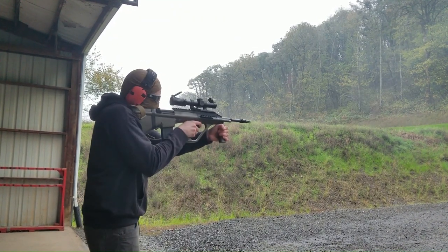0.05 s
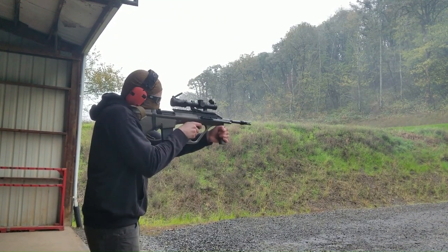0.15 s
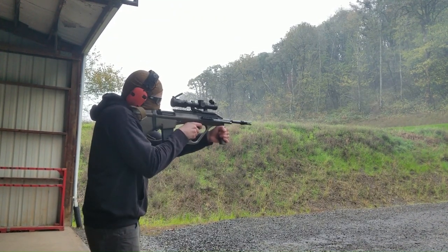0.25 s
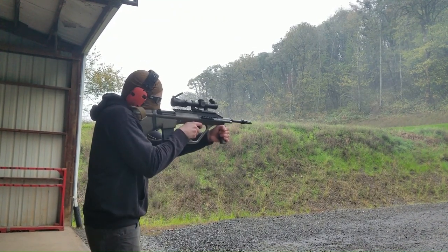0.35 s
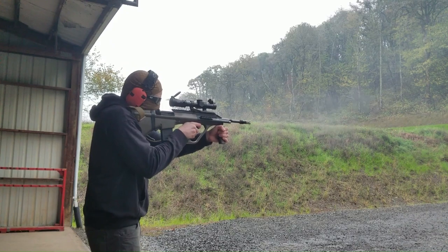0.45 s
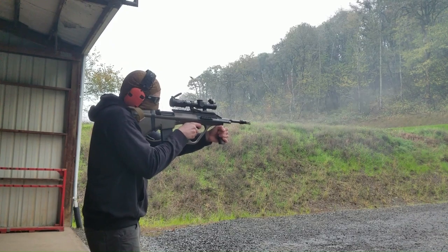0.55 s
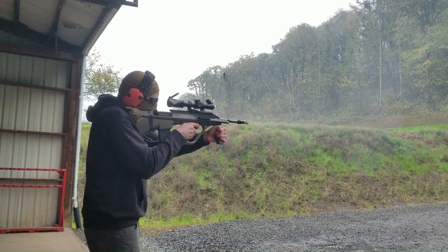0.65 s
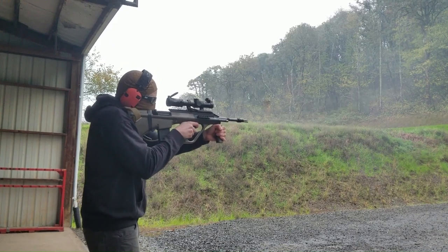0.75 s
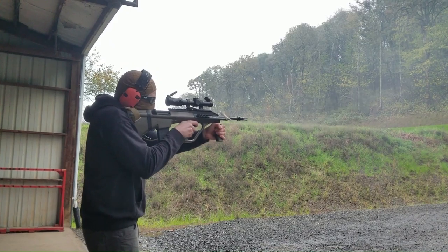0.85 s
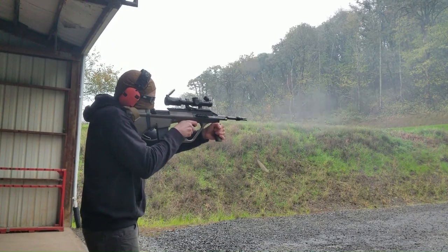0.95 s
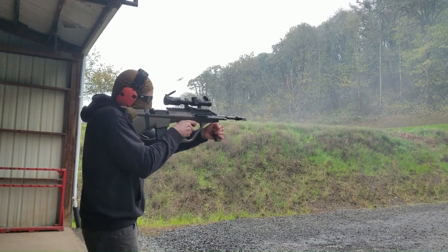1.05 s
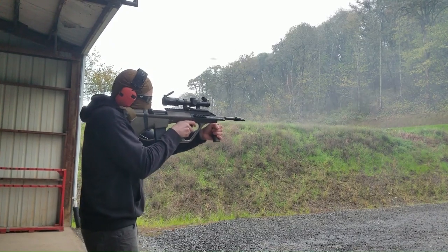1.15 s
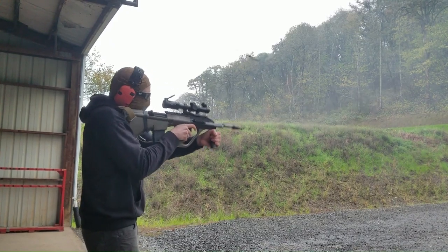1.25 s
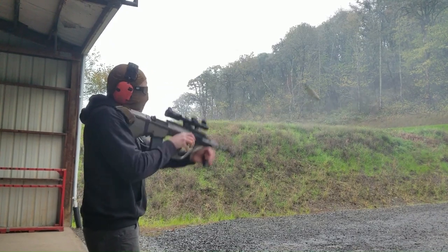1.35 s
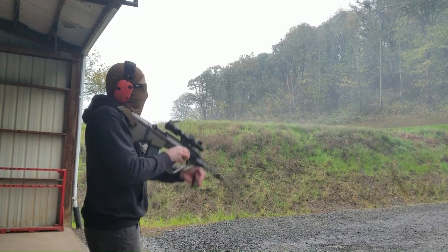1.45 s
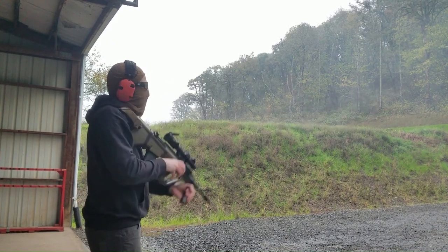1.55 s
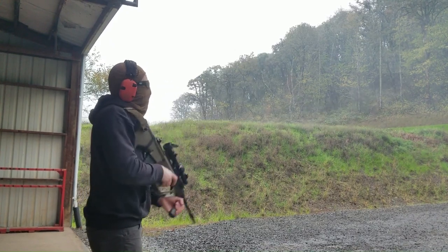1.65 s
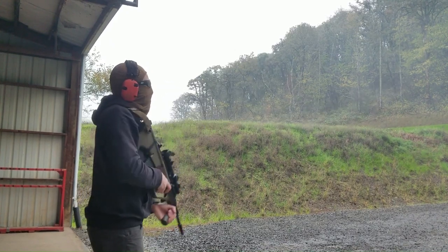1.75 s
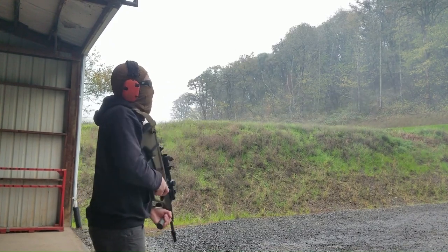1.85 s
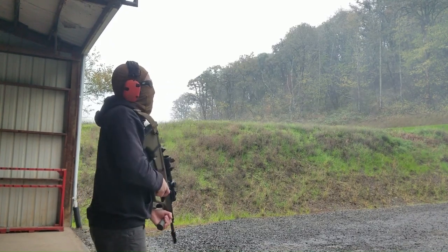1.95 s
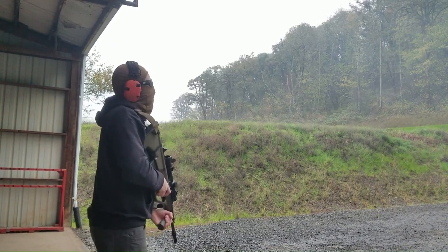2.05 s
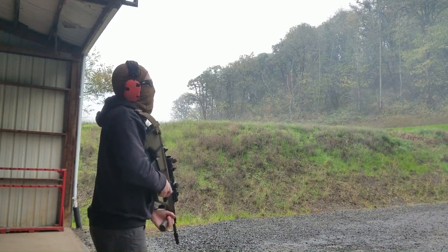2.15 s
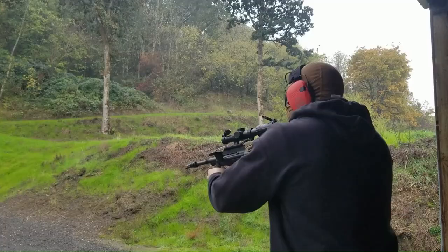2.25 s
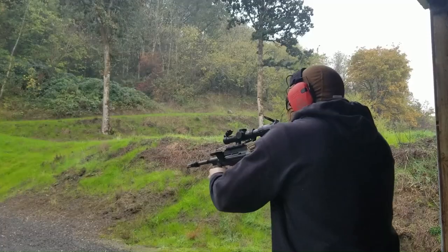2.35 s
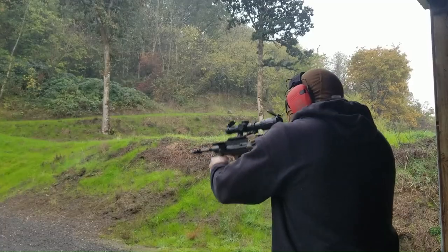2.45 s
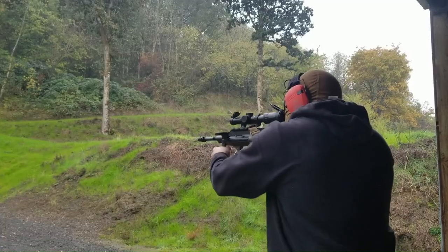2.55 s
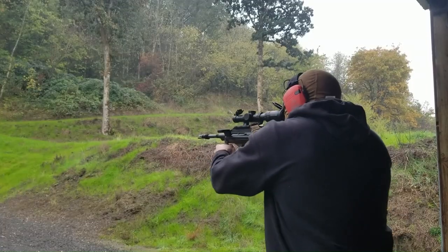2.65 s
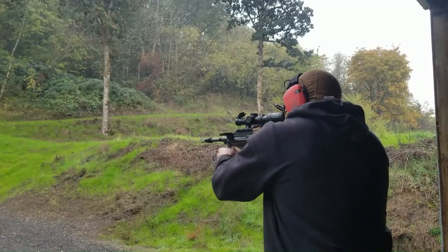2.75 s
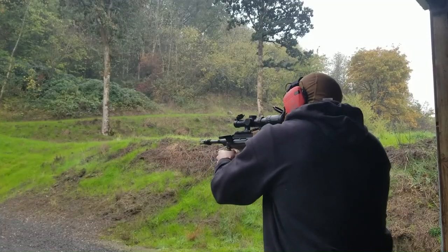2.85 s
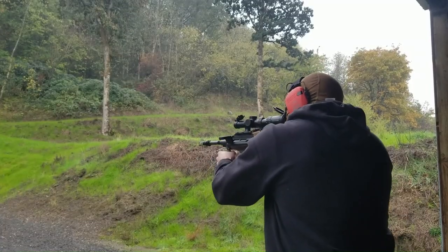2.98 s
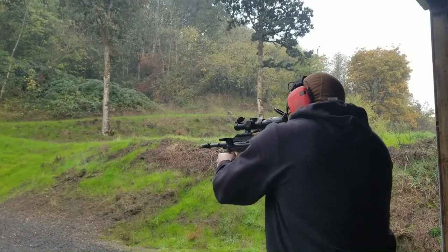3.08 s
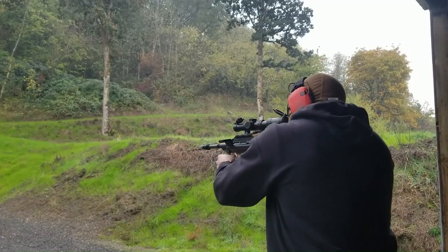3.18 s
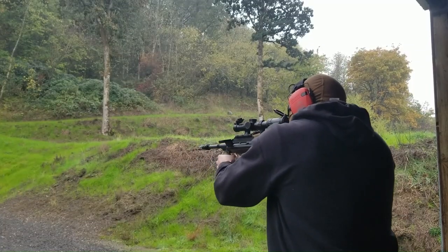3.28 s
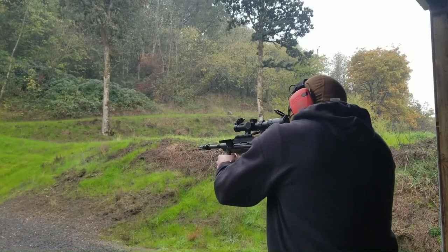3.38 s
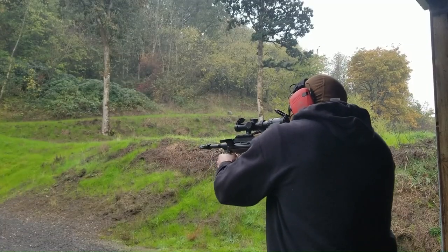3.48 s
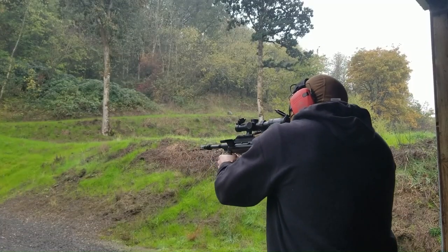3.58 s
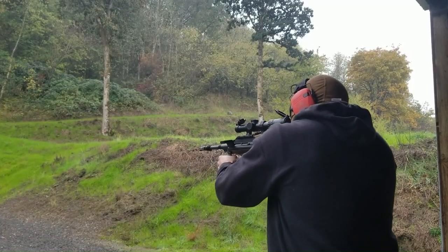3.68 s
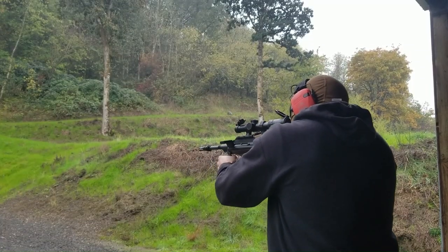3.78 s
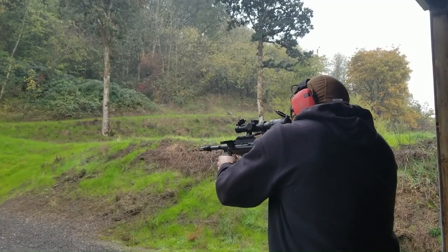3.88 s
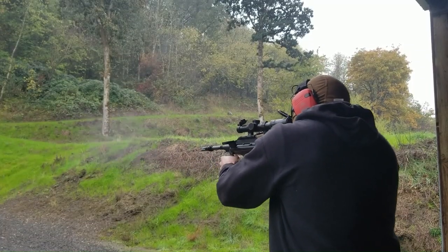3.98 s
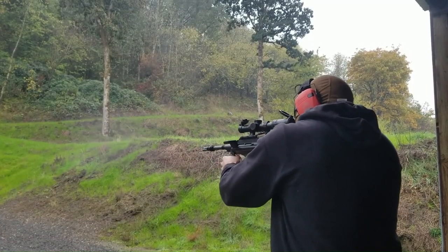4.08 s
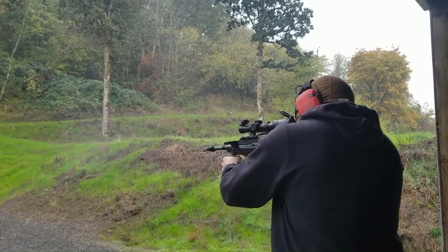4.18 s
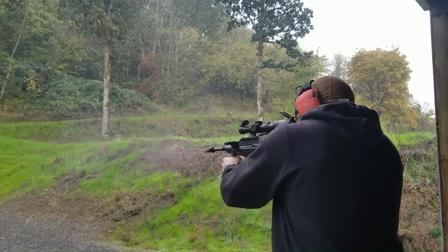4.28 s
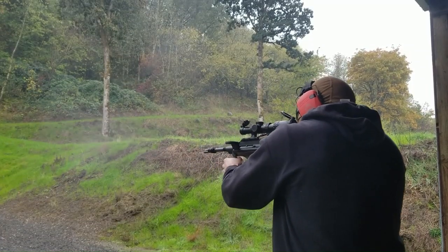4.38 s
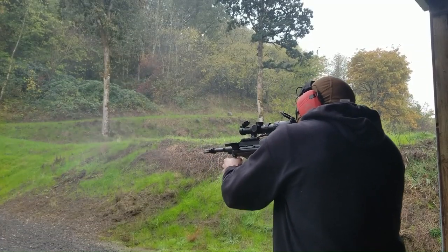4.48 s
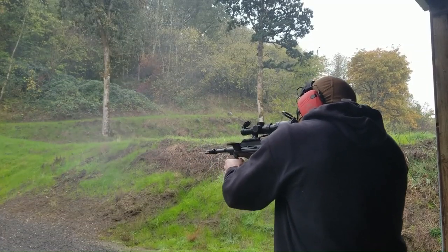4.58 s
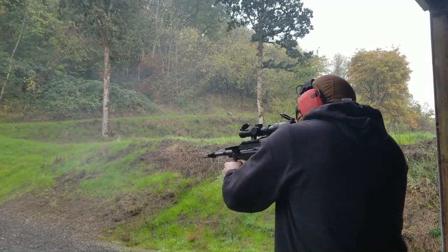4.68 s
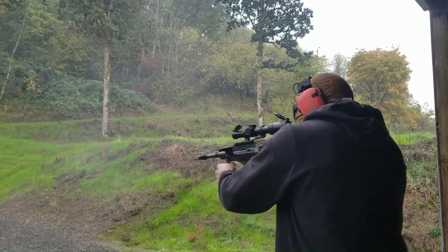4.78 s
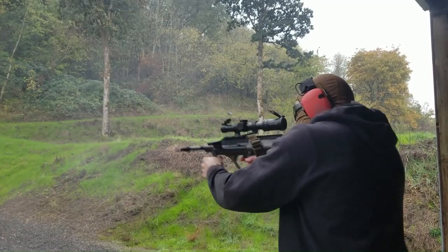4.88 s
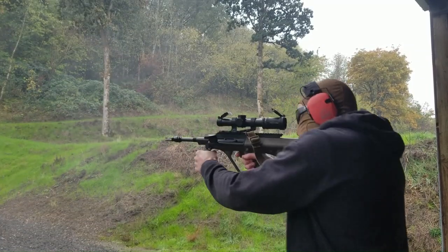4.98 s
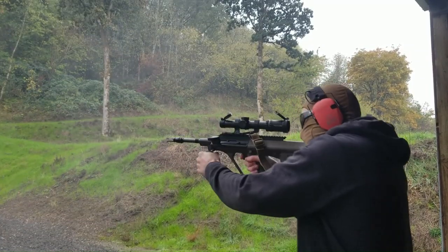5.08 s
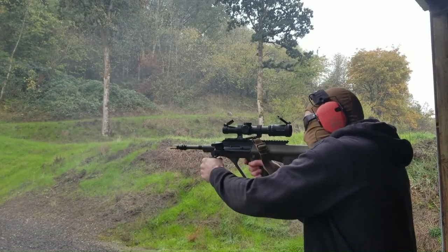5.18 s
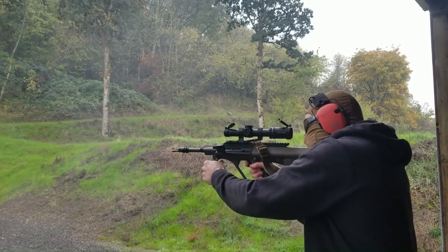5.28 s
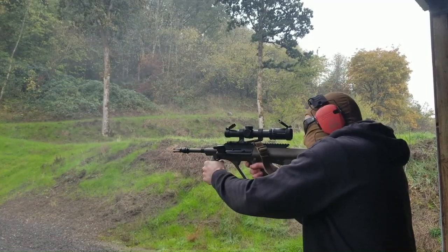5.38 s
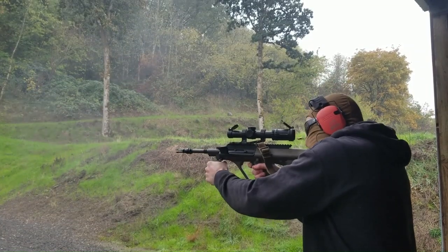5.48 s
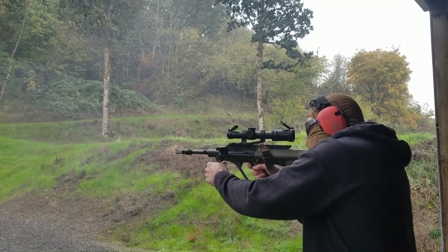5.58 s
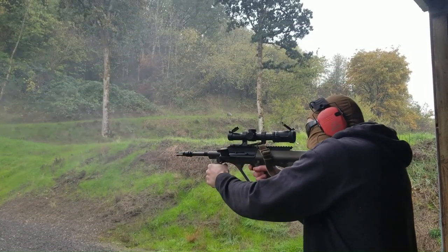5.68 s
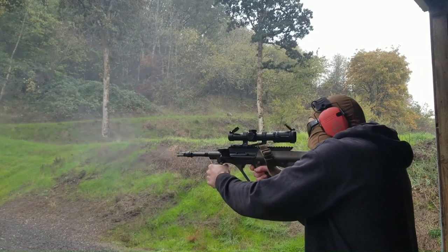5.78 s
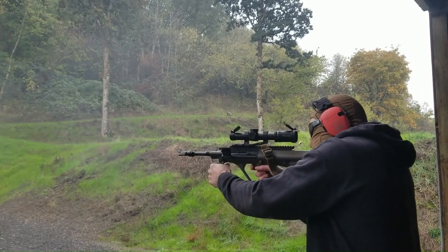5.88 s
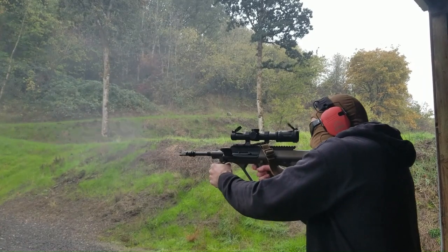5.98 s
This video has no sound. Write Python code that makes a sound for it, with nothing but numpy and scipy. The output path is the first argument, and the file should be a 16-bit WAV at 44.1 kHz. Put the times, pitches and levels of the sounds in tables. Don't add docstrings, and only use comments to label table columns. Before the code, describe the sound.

A rifle cracks in quick strings beneath a tin roof, blasts booming and dying outdoors, spent cases knocking on concrete, light rain heard between.

```python
import sys
import numpy as np
from scipy import signal
from scipy.io import wavfile
from scipy.ndimage import uniform_filter1d

SR = 44100
rng = np.random.default_rng(int(sys.argv[2]) if len(sys.argv) > 2 else 0)


def pcm_store(signal):
    levels = np.round(np.clip(np.atleast_2d(signal), -1, 1) * 32767)
    wavfile.write(sys.argv[1], SR, levels.astype(np.int16).T)


def makeup_ratio(level_db):
    decades = np.asarray(level_db, float) / 20
    return 10 ** decades


N = 265923
MOVE_S = 2.256

# frequency in Hz, level in dB.
BURIED_COLOUR = [(24, -28.5), (40, 9), (171, -11), (305, -5.5), (670, -4), (884, -9.5), (1220, -6.5),
                 (1400, -9), (6600, -21), (10000, -27.5), (13000, -59), (22000, -120)]
# frequency in Hz, level in dB.
RAIN_COLOUR = [(15, -52), (25, -6.5), (64, 1), (104, -3), (133, -7.5), (261, -6.5), (572, -2.5),
               (1250, 0.5), (1930, -8), (2520, -5), (3220, -13), (6310, -15), (8730, -31.5), (13100, -17.5),
               (15800, -32.5)]
# frequency in Hz, correlation from -1 to 1.
RAIN_SAME = [(60, 0.96), (130, 0.94), (290, 0.82), (640, 0.4), (1410, -0.09), (3100, 0.01), (6820, -0.01),
             (15000, -0.0)]
# frequency in Hz, left minus right in dB.
RAIN_LEAN = [(60, 1.5), (110, 1.0), (200, 1.0), (380, 1.5), (700, 1.0), (1290, 1.0), (2380, 1.0),
             (4400, 0.0), (8120, 2.0), (15000, 14.0)]
# frequency in Hz, correlation from -1 to 1.
BLAST_SAME = [
    [(60, 0.48), (130, 0.78), (290, 0.76), (640, 0.53), (1410, -0.09), (3100, 0.01), (6820, 0.0), (15000, -0.0)],
    [(60, 0.48), (130, 0.83), (290, 0.74), (640, 0.51), (1410, -0.14), (3100, 0.0), (6820, -0.06), (15000, 0.01)],
]
# frequency in Hz, left minus right in dB.
BLAST_LEAN = [
    [(60, 0.5), (110, -1.0), (200, -0.5), (380, 0.0), (700, 0.5), (1290, 0.0), (2380, 0.0), (4400, 0.0), (8120, 4.5), (15000, 11.0)],
    [(60, 1.0), (110, 0.0), (200, -0.5), (380, 0.5), (700, 0.5), (1290, 0.5), (2380, 0.0), (4400, -1.0), (8120, 1.5), (15000, 6.0)],
]
# start in seconds, knock level in dB, ring level in dB.
CASES = [(0.0508, -45, -76), (1.1645, -37, -52), (1.2835, -52.5, -50), (1.316, -53, -63),
         (1.4222, -49, -71.5), (1.4437, -57.5, -59), (1.5774, -80, -72), (1.6671, -62, -73),
         (1.6857, -56, -65), (1.75, -41, -43), (1.763, -52, -62), (2.045, -69.5, -71), (2.168, -80, -67),
         (2.1969, -80, -65), (5, -73, -71), (5.0395, -50, -50), (5.1204, -70.5, -71), (5.23, -64, -75),
         (5.244, -54.5, -66)]
# start in seconds, level in dB.
FLAT_LANDINGS = [
    (1.6671, -68.5),
    (1.75, -76),
    (2.045, -78),
    (2.168, -78),
    (5.244, -90),
]
# frequency in Hz, t60 in seconds, split as a share of the pitch.
BRASS_MODES = [
    (14800, .4, .007),
    (10850, 2.0, .004),
]
# start in seconds, roar in dB, snap at the muzzle in dB, heave of the gas cloud in dB.
SHOTS = [
    (0.3976, -13, 1, -10),
    (0.5798, -14.5, -6.5, -15.5),
    (.9440, -14, -9, -14),
    (3.9535, -12.5, 1.5, -7.5),
    (4.2959, -13, -10.5, -16),
    (4.5011, -14, -11, -14.5),
    (5.409, -14, -11.5, -14.5),
    (5.6142, -14, -10, -15.5),
    (5.7880, -14.5, -13, -16.5),
    (5.9867, -15, -7.5, -19),
]
# frequency in Hz, level in dB per Hz.
ROAR_COLOUR = [
    [(35, -35.5), (70, -11.5), (140, -10.5), (280, -7), (550, -9), (850, -7), (1400, -6.5), (2500, -9.5), (3800, -15.5), (6400, -15.5), (7600, -26.5), (9500, -25.5), (12800, -14), (15800, -25)],
    [(35, -30.5), (70, -12), (140, -3), (300, -6), (550, -6.5), (850, -4), (1400, -4.5), (2500, -7.5), (3800, -13), (6400, -11.5), (7600, -22.5), (9500, -22), (12800, -10.5), (15800, -20)],
]
# frequency in Hz, early extra loss in dB per second, late loss in dB per second,
# swell in dB as far roof panels answer.
ROAR_LOSS = [(40, 60.5, -13.5, 1), (112, 42.5, -10, 1), (294, 1, -3.5, 2.5), (610, -12, 8.5, 1.5),
             (890, 22.5, 8, .5), (2490, 24, 8, -2), (6800, 26.5, 24.5, -0.64), (12590, 79.5, 49.5, 2)]
# delay in seconds, left in dB, right in dB, width in milliseconds.
SLAPS = [
    [(.0003, -6, -1, .3), (.0040, 0, 4, .45), (.0085, -3, -2, .45), (.0148, -4, -1, .45), (.0178, -5, 0, .5)],
    [(.0003, -6, -2, .3), (.0045, -1, 3, .55), (.0100, -3, 4, .4), (.0168, -5, 0, .35), (.0228, -1, 2, .5)],
]
# frequency in Hz, t60 in seconds, left in dB, right in dB.
SWINGS = [
    [(248, .045, -3.5, 2), (106, 0.16, -5.5, 2)],
    [(208, 0.021, -5, -2), (101.1, 0.16, -4, -3.5)],
]
# frequency in Hz, level in dB per Hz.
CRACK_COLOUR = [(500, -13), (1200, -5), (2700, -4), (4000, -6), (5400, -6), (8500, -22), (12500, -6),
                (15800, -13)]
# delay in seconds, frequency in Hz, length in seconds,
# level against the roar in dB.
PANELS = [
    [(.055, 430, 0.0075, -7.5), (0.073, 560, 0.017, -4.5), (0.068, 560, 0.011, -16), (0.15, 760, .015, -8), (0.082, 140, 0.018, -11.5), (0.02, 250, 0.007, -9.5)],
    [(0.0993, 530, 0.027, -9.5), (.062, 200, 0.015, -16.5), (.108, 363, 0.023, -16), (.045, 650, 0.011, -15), (0.047, 1200, 0.006, -15.5), (0.15, 570, 0.01, -15.5)],
]


def evened(x):
    return x / np.sqrt(np.mean(x ** 2) + 1e-20)


def read(points, hz):
    where, value = np.transpose(points)
    return np.interp(np.log1p(hz), np.log1p(where), value)


def add(mix, s, sound):
    part = mix[:, round(s * SR):][:, :sound.shape[1]]
    part += sound[:, :part.shape[1]]


def steady(hz, s):
    return 0 * s


def noise_pair(length, size, colour, same, lean, shape_db):
    hop = size // 4
    frames = 4 * length // size + 5
    hz = np.fft.rfftfreq(size, 1 / SR)[:, None]
    a, b, c, d = rng.standard_normal((frames, len(hz), 4)).T
    alike = np.clip(read(same, hz), -1, 1)
    left = a + 1j * b
    right = alike * left + np.sqrt(1 - alike ** 2) * (c + 1j * d)
    z = np.array([left, right])
    z *= makeup_ratio(read(colour, hz) + shape_db(hz, np.arange(frames) * size / 4 / SR))
    inlet_db = 3.1 * np.exp(-((hz - 12900) / 1100) ** 2)
    z *= makeup_ratio(inlet_db)
    z *= makeup_ratio(np.array([.5, -.5])[:, None, None] * read(lean, hz))
    return signal.istft(z, nperseg=size, noverlap=size - hop)[1][:, :length]


def residue():
    faint = noise_pair(N, size=2048, colour=BURIED_COLOUR, same=RAIN_SAME, lean=RAIN_LEAN, shape_db=steady)
    return makeup_ratio(-73.5) * evened(faint)


def rain_patches_db(hz, s):
    field = rng.standard_normal((len(s), len(hz))).T
    smooth = uniform_filter1d(uniform_filter1d(field, size=20, axis=0), size=6, axis=1)
    return .8 * evened(smooth)


def rain_drops():
    sizes = makeup_ratio(4.0 * np.minimum(rng.exponential(1, (N, 2)).T, 5))
    drops = sizes * (rng.random((N, 2)).T < 300 / SR)
    u = np.arange(64) / SR
    tick = np.sin(2 * np.pi * 12800 * u) * np.exp(-u / 0.00041)
    return evened(signal.oaconvolve(drops, tick[None], axes=1)[:, :N])


def rain():
    wash = evened(noise_pair(N, size=1024, colour=RAIN_COLOUR, same=RAIN_SAME, lean=RAIN_LEAN,
                             shape_db=rain_patches_db))
    wash += makeup_ratio(-35.5) * rain_drops()
    t = np.arange(N) / SR
    creeping_db = -63.5 + 29 * t
    level_db = np.where(t < MOVE_S, creeping_db, -38)
    buried = ((t > SHOTS[0][0]) & (t < MOVE_S)) | (t > SHOTS[3][0])
    return wash * makeup_ratio(level_db) * ~buried


def ring(hz, t60, split, db):
    t = np.arange(SR) / SR
    spread, phase, size = rng.random((3, 2, 6, 1))
    pitch = hz * (1 + split * (spread - .5))
    modes = size * np.sin(2 * np.pi * (pitch * t + phase))
    return modes.sum(1) * makeup_ratio(db - 5 - 60 * t / t60)


def knock(db):
    t = np.arange(SR) / SR
    hiss = signal.lfilter([1, -.7], [1, .5, .55], rng.standard_normal((len(t), 2)).T)
    return evened(hiss) * makeup_ratio(db - 6.5) * (np.exp(-t / 0.0021) + makeup_ratio(-15.0 - 60 * t / 0.37))


def cases():
    out = np.zeros((2, N))
    high, low = BRASS_MODES
    for s, knock_db, ring_db in CASES:
        overtone = ring(15250, .15, .03, ring_db - 11)
        add(out, s, knock(knock_db) + ring(*high, ring_db) + overtone)
    for s, ring_db in FLAT_LANDINGS:
        add(out, s, ring(*low, ring_db))
    t = np.arange(N) / SR
    lean_db = np.where(t < MOVE_S, 13.5, 10)
    return out * makeup_ratio(np.array([[.5], [-.5]]) * lean_db) * (abs(t - MOVE_S - .5) > .5)


def panels(place, scatter):
    t = np.arange(SR // 4) / SR
    port_lag = np.array([[0], [.0003]])
    out = np.zeros((2, len(t)))
    for (s, hz, length, db), jolt in zip(PANELS[place], scatter):
        hum = np.sin(2 * np.pi * hz * (t - s - port_lag))
        out += makeup_ratio(db + 0.95 * jolt) * hum * np.exp(-((t - s) / length) ** 2)
    return out * np.minimum(t / .01, 1)


def roar_loss_db(hz, s):
    where, *columns = np.transpose(ROAR_LOSS)
    early, late, swell = (np.interp(np.log1p(hz), np.log1p(where), c) for c in columns)
    answer_db = swell * s / .08 * np.exp(1 - s / 0.081)
    return answer_db - late * s - (early - late) * 0.37 * (1 - np.exp(-s / 0.21))


def fade_db(t):
    full_s, field_s, horizon_s = 0.062, 0.49, 1.06
    rise = np.interp(t, [0, .0018, .0036, .005], [-13, -3, -8.5, 0])
    shelter = 62.5 * np.clip(t - full_s, 0, field_s - full_s)
    field = 43 * np.clip(t - field_s, 0, horizon_s - field_s)
    horizon = 95 * np.maximum(t - horizon_s, 0)
    return rise - shelter - field - horizon


def roar(place):
    end_s = 1.4
    length = round(end_s * SR)
    x = noise_pair(length, size=1024, colour=ROAR_COLOUR[place], same=BLAST_SAME[place],
                   lean=BLAST_LEAN[place], shape_db=roar_loss_db)
    t = np.arange(length) / SR
    x = x / np.std(x[:, :SR // 10]) * makeup_ratio(fade_db(t))
    return x * np.minimum(t / .0002, 1) * np.minimum((end_s - t) / .1, 1)


def swing(hz, t60, left_db, right_db):
    t = np.arange(SR // 4) / SR
    delay = np.array([[.0014], [.0008]]) * [[200 / hz], [1]]
    late = np.maximum(t - delay, 0)
    return np.sin(2 * np.pi * hz * late) * makeup_ratio(np.array([[left_db], [right_db]]) - 60 * t / t60)


def slaps(place, scatter):
    t, out = np.arange(2000) / SR, np.zeros((2, 2000))
    for (s, left_db, right_db, ms), jolt in zip(SLAPS[place], scatter):
        u = np.maximum(t - s - .00012 * jolt, 0) * 1000 / ms
        level = makeup_ratio(np.array([[left_db], [right_db]]) + 1.5 * jolt)
        out -= level * 5 * u * (1 - u / 3) * np.exp(-u * 1.3)
    return out


def crack(place):
    hiss = noise_pair(1024, size=256, colour=CRACK_COLOUR, same=BLAST_SAME[place], lean=BLAST_LEAN[place],
                      shape_db=steady)
    t = np.arange(400) / SR
    return .55 * evened(hiss[:, 300:700]) / (1 + (t / .002) ** 6)


def rifle():
    slaps_db, thud_db = (-14.5, -8.5), (-8, 0.3)
    out = np.zeros((2, N))
    shared = [roar(0), roar(1)]
    scatter = rng.standard_normal((len(SHOTS), 8))
    before = None
    for (s, roar_db, snap_db, heave_db), jolts in zip(SHOTS, scatter):
        place = int(s > MOVE_S)
        push, thud = SWINGS[place]
        echoes = .8 * shared[place] + .6 * roar(place)
        t = np.arange(echoes.shape[1]) / SR
        squash_db = (place == before) * -3.5 * np.exp(-t / 0.076)
        add(out, s, echoes * makeup_ratio(roar_db + squash_db))
        add(out, s, makeup_ratio(heave_db) * swing(*push))
        add(out, s, makeup_ratio(heave_db + thud_db[place]) * swing(*thud))
        add(out, s, makeup_ratio(0.67 * snap_db + slaps_db[place]) * slaps(place, jolts))
        add(out, s, makeup_ratio(roar_db) * panels(place, jolts[::-1]))
        add(out, s, makeup_ratio(snap_db) * crack(place))
        before = place
    return out


def scene():
    return residue() + rain() + cases() + rifle()


def low_pass(x):
    return signal.sosfilt(signal.butter(12, 16880, fs=SR, output="sos"), x)


def record(dry):
    thin = signal.sosfilt(signal.butter(3, 40, "high", fs=SR, output="sos"), dry)
    rounded = thin / (1 + (abs(thin) / .77) ** 4) ** .25
    edge = signal.firwin(255, 15900, window=("kaiser", 7), fs=SR)
    mix = signal.oaconvolve(rounded, edge[None], "same", axes=1)
    return low_pass(mix)


dry = scene()
out = record(dry)
pcm_store(out)
```